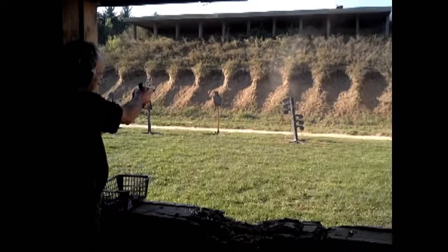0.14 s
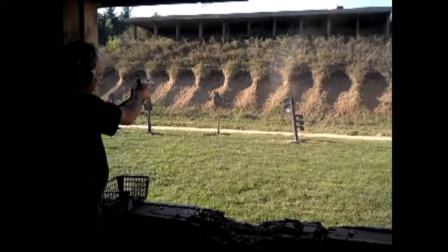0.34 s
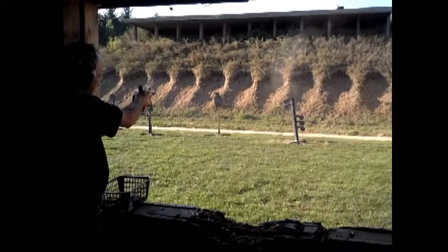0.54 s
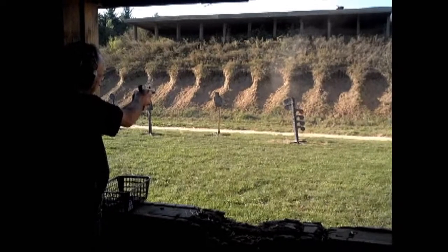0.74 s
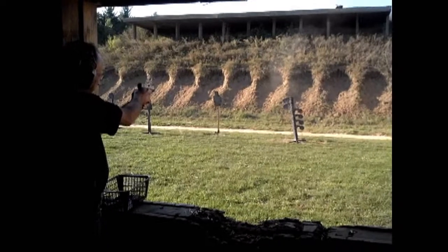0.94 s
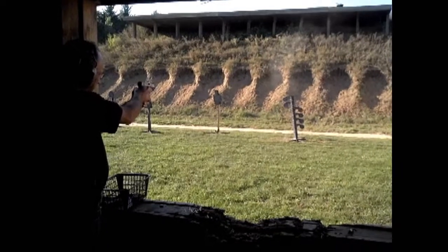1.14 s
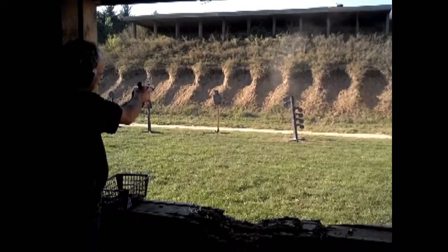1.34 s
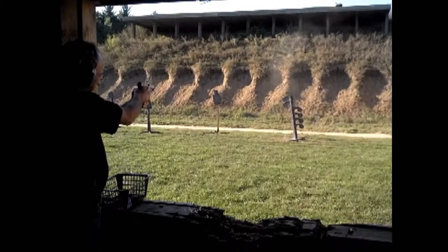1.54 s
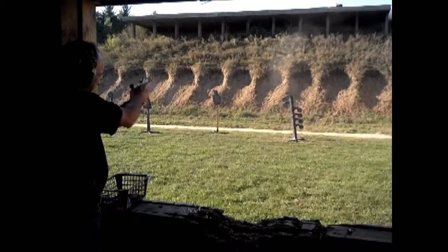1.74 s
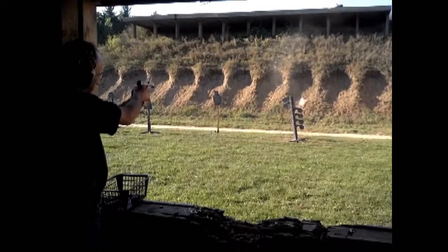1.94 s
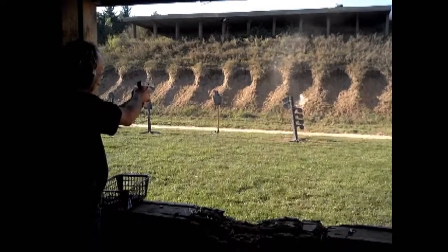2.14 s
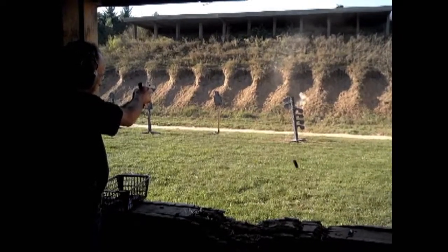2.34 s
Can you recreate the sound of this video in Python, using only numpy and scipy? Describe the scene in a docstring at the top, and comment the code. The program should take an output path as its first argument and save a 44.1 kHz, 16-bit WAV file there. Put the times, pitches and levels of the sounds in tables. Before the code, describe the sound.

Handgun shots from two pistols, two close together, then single shots about a second apart, roll off earth banks outdoors; steel plates ring on the right, distant shots sound faintly, captured on a small wide-stereo camera.

```python
"""Two shooters take turns with handguns under the roof of an outdoor range; further shots sound far off.
Each bang is a cluster of struck rings plus band-filtered noise that rolls off the roof and earth banks.
Steel plates ring when hit, as sums of decaying modes with a splash of hiss; small metal pings sit to the right.
Outdoor air is flickering noise, and a small camera limits its band and widens its stereo picture."""
import sys
import numpy as np
from scipy import signal
from scipy.io import wavfile

SR = 44100
rng = np.random.default_rng(int(sys.argv[2]) if len(sys.argv) > 2 else 0)


def boost_factor(decibels):
    """Convert a level in decibels to a linear amplitude factor."""
    exponent = np.asarray(decibels, float) / 20
    return 10 ** exponent


def materialize(psi):
    """Save the field psi as 16-bit PCM at rate SR to the path in sys.argv[1].

    A 1-D psi becomes a single channel; in a 2-D psi each row is a channel.
    """
    bounded = np.clip(np.atleast_2d(psi).T, -1, 1)
    quanta = np.round(bounded * 32767).astype(np.int16)
    wavfile.write(sys.argv[1], SR, quanta)


N = 110250  # 2.5 s


def at_hz(rows, hz):
    """Read every column of a table at a frequency, between rows on a log-frequency scale."""
    table_hz, *columns = np.transpose(rows)
    return [np.interp(np.log(hz), np.log(table_hz), column) for column in columns]


def since(start_s):
    """Seconds since an event, zero before it."""
    return np.maximum(np.arange(N) / SR - start_s, 0)


def fall(age, t60):
    """Exponential decay of 60 dB in t60 seconds."""
    return boost_factor(-60 * age / max(t60, 1e-3))


def swell_in(age, rise):
    """Exponential approach to full height, with rise as its time constant in seconds."""
    return 1 - np.exp(-age / rise)


def ring(start_s, level_db, pitch_hz, t60, rise=1e-5):
    """A mode struck once: a sine that swells in, then decays by 60 dB."""
    out = np.zeros(N)
    i = int(start_s * SR)
    age = np.arange(min(N - i, int(t60 * SR))) / SR
    wave = np.sin(2 * np.pi * pitch_hz * age)
    out[i:i + len(age)] = boost_factor(level_db) * wave * fall(age, t60) * swell_in(age, max(rise, 1e-5))
    return out


SAME_ROLL = 0.93  # amplitude weight of the noise that repeats from shot to shot


def shot_noises(shots):
    """Noise shifted to each shot; part of it repeats, since gun and banks stay in place."""
    shared = rng.standard_normal((2, 2, N))
    noises = []
    for start_s, _ in shots:
        fresh = rng.standard_normal((2, 2, N))
        mixed = SAME_ROLL * shared + np.sqrt(1 - SAME_ROLL ** 2) * fresh
        noises.append(np.roll(mixed, int(start_s * SR), axis=2))
    return noises


# how each bang rolls around its stand, before the level of the shot:
# band_hz, level_db (per Hz), rise_s (time constant), hold_s, t60_s
FIRST_ROLL = [(63.6, -90, .003, .01, 0.26), (150, -56.5, 0.0017, 0.013, 0.47),
              (324, -49.5, 0.00084, .01, 0.31), (800, -56.5, 0.003, 0.0074, 0.41),
              (2000, -57, 0.0002, 0.0058, 0.32), (3770, -68, 0.00021, .004, 0.31),
              (8000, -74, .0005, 0.0014, 0.32), (15500, -78, 0.00065, 0.0013, 0.29)]
SECOND_ROLL = [(60, -54, .01, 0.013, 0.1), (139, -51, 0.0067, 0.079, 0.37), (324, -43.5, 0.025, 0.053, .45),
               (747, -48, 0.0071, 0.062, 0.43), (2050, -54, .003, 0.048, 0.33),
               (4000, -62, 0.0011, 0.013, 0.39), (7510, -65, 0.00033, 0.0067, 0.3),
               (14400, -71.5, .001, .02, 0.28)]
FAR_ROLL = [(102, -99, 0.044, .05, .5), (500, -86.5, 0.026, .02, 0.48), (1500, -76, 0.012, 0.011, 0.48),
            (4000, -82, 0.0083, 0.02, .4), (9000, -99.5, 0.0083, .03, 0.47),
            (15000, -100, 0.075, 0.024, 0.13)]
# knee of the roll, after which it dies faster: after_shot_s, added_t60_s
FIRST_KNEE = (0.28, 0.48)
SECOND_KNEE = (0.26, 0.17)
FAR_KNEE = (0.26, 1)
# slow tail of the open field, before it follows the colour and share of each gun:
# band_hz, level_db (per Hz), t60_s
FIELD = [(58.6, -82.5, 2.1), (200, -59.5, 0.96), (790, -73.5, 1.13), (2480, -88, 1.63), (6000, -100, 1.1),
         (15500, -115, .6)]
# echoes off the banks, before their colour: after_shot_s, level_db, length_s
FIRST_ECHOES = [(0.158, -74, 0.031), (.35, -94.5, .012)]
SECOND_ECHOES = [(0.201, -74.5, 0.014)]
# colour of the bank echoes: band_hz, gain_db
ECHO_COLOUR = [(100, -20), (400, 6.5), (1000, -7.6), (2000, -3.5), (5000, -13.5), (15500, -60.5)]


def roll_shape(hz, roll, knee, echoes, gun_db):
    """Height over time after a shot in one band: roll, field tail and bank echoes add in power."""
    age = np.arange(0, N, 8) / SR
    roll_db, rise, hold, t60 = at_hz(roll, hz)
    field_db, field_t60 = at_hz(FIELD, hz)
    knee_s, added_t60 = knee

    near = boost_factor(roll_db) * swell_in(age, max(rise, 1e-4))
    near = near * fall(np.maximum(age - hold, 0), t60)
    near = near * fall(np.maximum(age - knee_s, 0), added_t60)

    # the tail takes on the colour of this gun, relative to the second gun
    colour_db = roll_db - at_hz(SECOND_ROLL, hz)[0]
    field = boost_factor(field_db + gun_db + colour_db) * np.minimum(age / .03, 1) * fall(age, field_t60)

    power = near ** 2 + field ** 2
    for delay, echo_db, length in echoes:
        hump = np.exp(-np.minimum(((age - delay) / length) ** 2, 50))
        power += boost_factor(echo_db + at_hz(ECHO_COLOUR, hz)[0]) ** 2 * hump
    return np.interp(np.arange(N) / SR, age, np.sqrt(power))


# shots of the first pistol, of the second, and far along the range: start_s, level_db (relative)
FIRST_SHOTS = [(0.2214, 0), (1.2193, 0.5), (2.1790, 0.24)]
SECOND_SHOTS = [(0.3833, 0.51), (1.8546, -0.222)]
FAR_SHOTS = [(0.022, -21), (0.807, -1.3)]
# share of the field tail for the first, second and far gun: gain_db
FIELD_DB = [0.5, 4.6, -7]
# outdoor air, before swell and flicker: band_hz, level_db (per Hz)
AIR = [(40, -104), (150, -96), (300, -103), (600, -101), (1000, -101), (2000, -105), (4000, -112),
       (8000, -122), (15500, -132)]
# rumble of the wider range, full in the lowest bands and fading out upward: time_s, gain_db
AIR_LEVEL = [(0.0, 9), (0.2, 10), (0.7, -2), (0.98, 14.5), (1.08, 23), (1.2, 15), (1.5, 1.5), (1.7, -1.5),
             (1.85, 9.5), (2.5, 8)]
# likeness of the two capsules: band_hz, likeness (-1 opposite, 1 equal)
LIKENESS = [(60, .4), (130, .4), (260, .55), (600, .65), (1000, .15), (1500, -.2), (2200, .05),
            (15500, .05)]
AIR_SWELL_HZ = 1500  # the rumble's gain in dB is halved here
AIR_FLICKER_DB = 1.5


def rolls_and_air():
    """Each half-octave band carries the rolls of all shots and the air, with its own left-right likeness."""
    guns = [(FIRST_SHOTS, FIRST_ROLL, FIRST_KNEE, FIRST_ECHOES),
            (SECOND_SHOTS, SECOND_ROLL, SECOND_KNEE, SECOND_ECHOES),
            (FAR_SHOTS, FAR_ROLL, FAR_KNEE, [])]
    noises = [shot_noises(gun[0]) for gun in guns]
    air = rng.standard_normal((2, 2, N))  # noise set, mid or side, time
    out = 0
    edges = np.geomspace(35, 16900, 19)
    for k, (low, high) in enumerate(zip(edges, edges[1:])):
        noise_set = k % 2  # neighbouring bands use separate noise
        hz = np.sqrt(low * high)
        flicker = np.interp(np.arange(N), np.linspace(0, N, 25), rng.standard_normal(25))
        swell_db = np.interp(np.arange(N) / SR, *np.transpose(AIR_LEVEL)) / (1 + (hz / AIR_SWELL_HZ) ** 2)
        air_db = at_hz(AIR, hz)[0] + swell_db + AIR_FLICKER_DB * flicker
        band = boost_factor(air_db) * air[noise_set]

        for (shots, roll, knee, echoes), gun_noises, gun_db in zip(guns, noises, FIELD_DB):
            shape = roll_shape(hz, roll, knee, echoes, gun_db)
            for (start_s, level_db), noise in zip(shots, gun_noises):
                i = int(start_s * SR)
                band[:, i:] += boost_factor(level_db) * shape[:N - i] * noise[noise_set, :, i:]

        band_filter = signal.butter(2, [low, high], "band", fs=SR, output="sos")
        mid, side = signal.sosfilt(band_filter, band)
        alike = np.clip(at_hz(LIKENESS, hz)[0], -1, 1)
        out = out + np.sqrt(1 + alike) * mid + np.sqrt(1 - alike) * side * [[1], [-1]]
    return out * np.sqrt(SR / 4)  # from levels per Hz to sample levels


# short rings with every shot: the blast at muzzle and roof, single claps off the banks, a late thud;
# levels before those of shot and capsule: after_shot_s, level_db, pitch_hz, t60_s, rise_s (time constant)
FIRST_CLAPS = [(.0002, -9.5, 2223, 0.013, 0.000091), (.0001, -17, 3720, 0.013, .0001),
               (.001, -3.5, 493, 0.0063, 0.00052), (.003, -27.5, 760.5, 0.24, 0.0019),
               (.001, -37.5, 150, 0.039, 0.0056), (.1402, -28, 1000, .008, .0003),
               (.1427, -23, 1100, .01, .0003), (.168, -26, 1100, .008, .0003),
               (.1705, -27, 700, .012, .0003), (.345, -48.5, 720, 0.096, 0.0085),
               (0.448, -49, 142, 0.18, 0.023)]
SECOND_CLAPS = [(.0003, -29, 2095, 0.06, 0.000067), (.0005, -19.5, 880, .015, .0003),
                (.01, -28, 126, .25, 0.01), (.02, -19, 330.4, .3, 0.0067), (.02, -25.5, 673, .25, .02),
                (.1, -32, 228, .7, 0.017), (.5, -38.5, 140, .2, 0.018)]
FAR_CLAPS = [(.002, -49.5, 1270, 0.33, 0.0087), (.002, -58, 1530, 0.27, 0.0075),
             (.002, -45, 1770, 0.17, 0.013), (.002, -50.5, 2070, 0.14, 0.0077)]
# the capsule turned away hears a clap weaker and later
NEAR_DB, FAR_DB, LAG_S = 5.5, -12, .0004


def blasts():
    """The claps of every shot as short struck rings, first on the side where the gun stands."""
    out = np.zeros((2, N))
    guns = [(0, FIRST_SHOTS, FIRST_CLAPS),  # 0 left, 1 right
            (1, SECOND_SHOTS, SECOND_CLAPS),
            (1, FAR_SHOTS, FAR_CLAPS)]
    for side, shots, claps in guns:
        one_shot = sum(ring(*row) for row in claps)
        for start_s, level_db in shots:
            for channel, lag, side_db in [(side, 0, NEAR_DB), (1 - side, LAG_S, FAR_DB)]:
                i = int((start_s + lag) * SR)
                out[channel, i:] += boost_factor(level_db + side_db) * one_shot[:N - i]
    return out


# small metal pings, the first ringing with the far shot, the others perhaps falling cases; level at the right
# capsule: # start_s, level_db, pitch_hz, t60_s, rise_s (time constant)
PINGS = [(0.024, -46, 2060, 0.052, 0.0062), (0.935, -59.5, 6250, 0.14, 0.0028),
         (1.476, -55, 10950, 0.077, .002), (1.661, -71.5, 7300, .2, .01)]


def pings():
    """Single short decaying rings, off to the right."""
    return sum(ring(*row) for row in PINGS) * np.array([[.4], [1]])


# blows on the plates: start_s, level_db (before that of each mode), splash_db (before the hiss filter),
# splash_t60_s; the second plate's ring swells softly once more, a little sharper, perhaps off the bank
FIRST_HITS = [(0.292, -37.5, -67, .1), (1.285, -40, -31, .1), (1.925, -44.5, -62, 0.081),
              (2.25, -44, -48, 0.065)]
SECOND_HITS = [(0.455, -19.5, -25.5, 0.29), (0.625, -42.5, -59, 0.44)]
# plate modes before the pitch ratio of the blow: pitch_hz
FIRST_HZ = [3499, 4296, 6595, 7332, 7828, 7845, 9708, 12013, 12787]
SECOND_HZ = [2060, 2259, 3523, 4316, 5568, 6272, 6700, 7839, 8860, 11690, 12850, 15020]
# one row a mode: t60_s (before the blow's ratio), then level_db for each blow, by where it lands
FIRST_PLATE = [(0.44, 1.2, -0.2, -25, 1), (0.8, -5, -35, -32, -5.5), (0.37, -17, -8, -35, -10.5),
               (0.36, -24, -0.5, -32, -5), (0.4, -32, -19, -30, -7), (.6, -23, -8.5, -30, 0),
               (0.47, -38.5, -18, -26, -22), (.35, -34, -21, -32, -7), (0.4, -21, -3, 3, -23)]
SECOND_PLATE = [(0.16, -28, -0.5), (0.88, -15, -19), (0.45, -18, -12), (0.37, -1.7, 2.9),
                (0.343, -16.5, -10), (0.248, -19, -27), (0.35, -20, -33), (0.28, -5, -3),
                (0.243, -29.5, -36), (.1, -15.5, -35), (0.26, -25.5, -28), (.15, -29.5, -24)]
# for each blow: pitch_ratio
FIRST_PITCH = [.999, 1, .999, 1]
SECOND_PITCH = [1, 1.008]
# for each blow: rise_s (time constant)
FIRST_RISE = [.002, .002, .002, .004]
SECOND_RISE = [.002, .015]
# for each blow: t60_ratio
FIRST_LASTS = [0.85, .9, .95, 0.85]
SECOND_LASTS = [0.9, 1.86]
# band of the splash hiss: low_hz, high_hz
SPLASH_HZ = 2413, 11000
WAVER_S, WAVER_DB = .025, 2  # random wavering of the ring's level: step between random levels, depth


def plates():
    """Each blow strikes the decaying modes of its plate, heard from the right, with a splash of hiss."""
    rings, splash = np.zeros(N), np.zeros(N)
    both = [(FIRST_HITS, FIRST_PITCH, FIRST_RISE, FIRST_LASTS, FIRST_HZ, FIRST_PLATE),
            (SECOND_HITS, SECOND_PITCH, SECOND_RISE, SECOND_LASTS, SECOND_HZ, SECOND_PLATE)]
    for hits, pitches, rises, lasts, modes_hz, modes in both:
        for k, (start_s, level_db, splash_db, splash_t60) in enumerate(hits):
            for hz, (t60, *mode_db) in zip(modes_hz, modes):
                waver = np.interp(np.arange(N) / SR / WAVER_S, np.arange(300), rng.standard_normal(300))
                mode = ring(start_s, level_db + mode_db[k], hz * pitches[k], t60 * lasts[k], rises[k])
                rings += mode * boost_factor(WAVER_DB * waver)
            age = since(start_s)
            splash += boost_factor(splash_db) * fall(age, splash_t60) * swell_in(age, rises[k])
    hiss_filter = signal.butter(1, SPLASH_HZ, "band", fs=SR, output="sos")
    hiss = signal.sosfilt(hiss_filter, rng.standard_normal((2, N)))
    return rings * np.array([[.15], [1]]) + splash * hiss


def scene():
    """All sources at the two capsules."""
    return rolls_and_air() + blasts() + pings() + plates()


TOP = .36  # ceiling of the rounded peaks, before widening
WIDEN_SAMPLES, WIDEN_SHARE = 16, .89  # delay and gain of the opposite channel
CUTOFF_HZ, ABOVE_DB = 19600, -16  # stopband edge of the low-pass, gain of what it removes


def top_cut(x):
    """Nothing passes above the cut-off."""
    return signal.sosfilt(signal.butter(12, 16850, fs=SR, output="sos"), x)


def record(dry):
    """Camera: peaks rounded, a delayed copy of the other channel taken off each, the top turned down."""
    rounded = TOP * np.tanh(dry / TOP)
    opposite = np.pad(rounded[::-1], ((0, 0), (WIDEN_SAMPLES, 0)))[:, :N]
    wide = rounded - WIDEN_SHARE * opposite
    low_pass = signal.cheby2(10, 40, CUTOFF_HZ, fs=SR, output="sos")
    low = signal.sosfiltfilt(low_pass, wide)
    mix = low + boost_factor(ABOVE_DB) * (wide - low)
    return top_cut(mix)


dry = scene()
out = record(dry)
materialize(out)
```